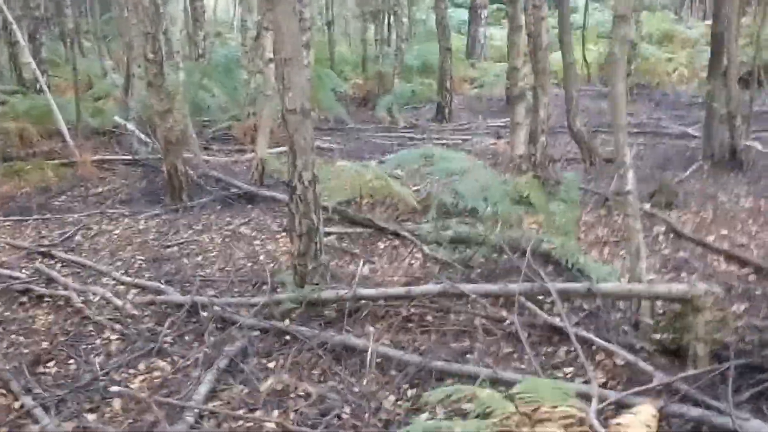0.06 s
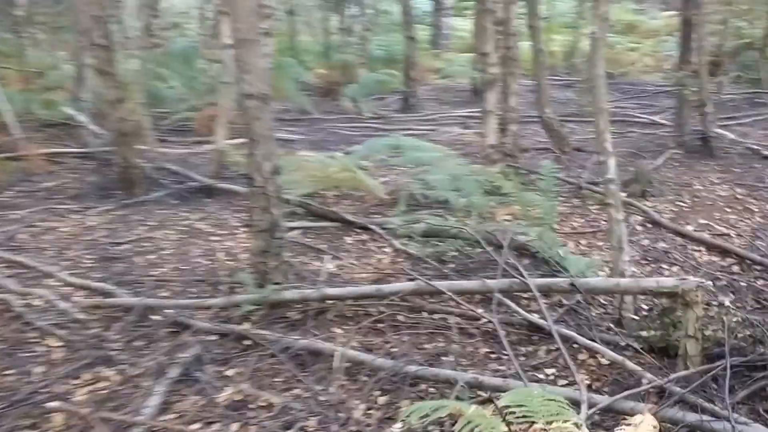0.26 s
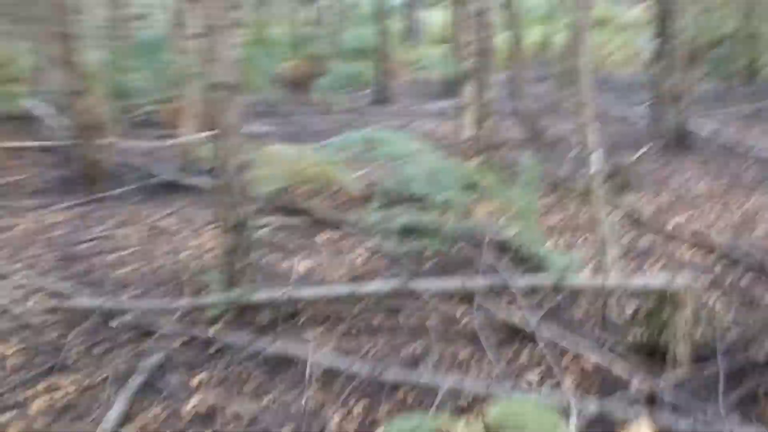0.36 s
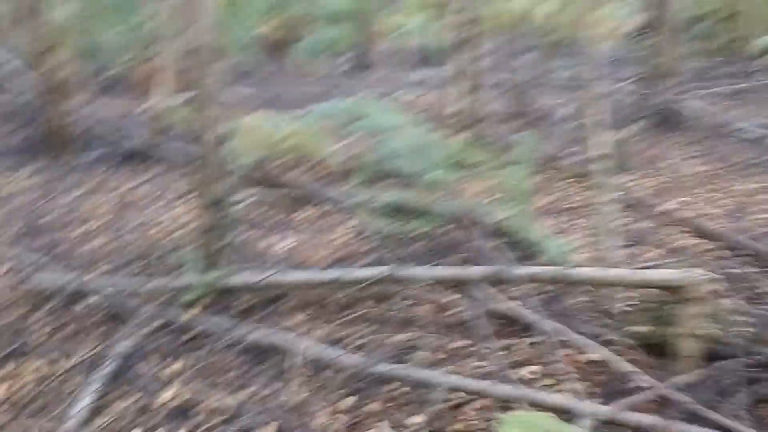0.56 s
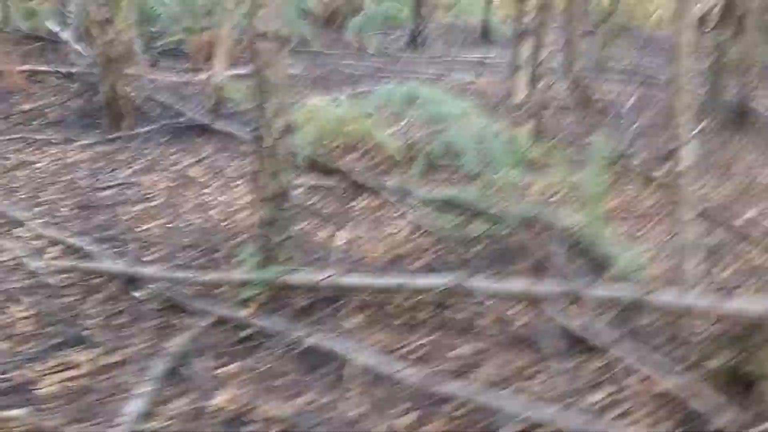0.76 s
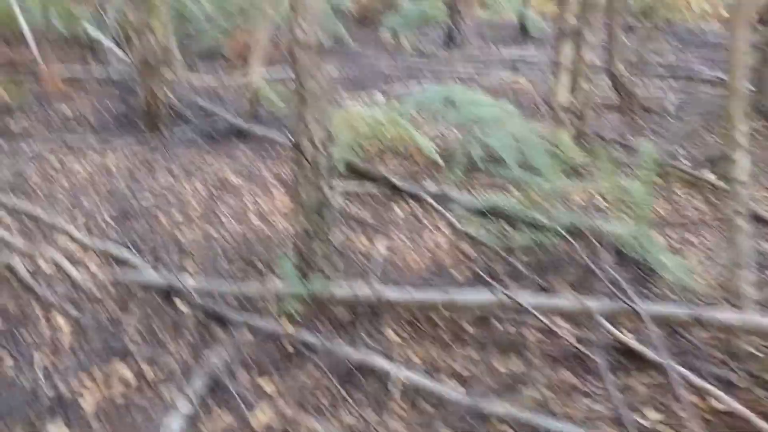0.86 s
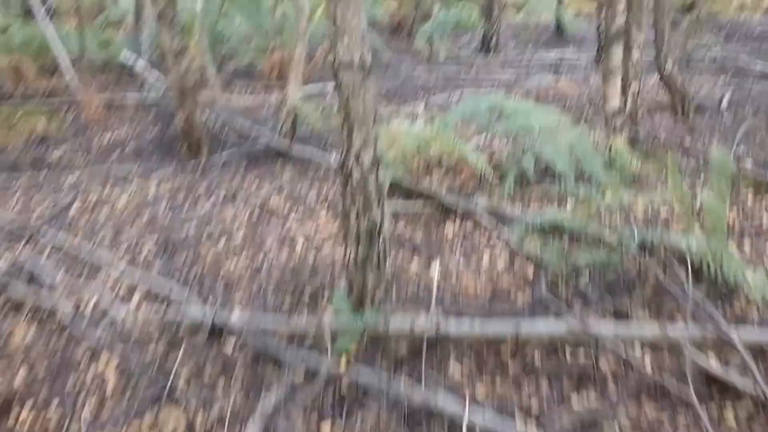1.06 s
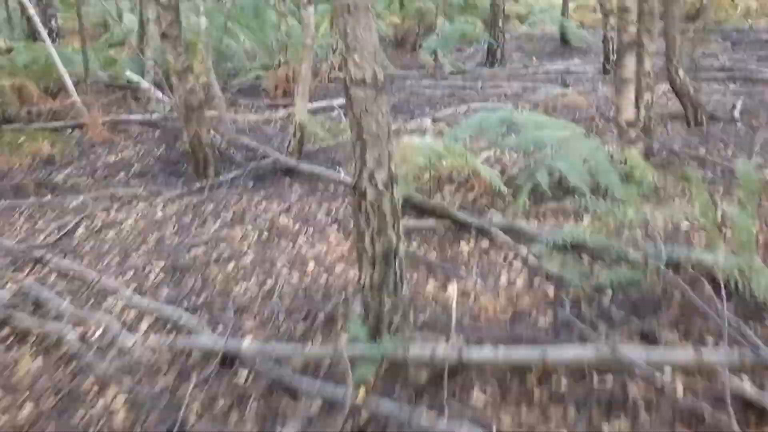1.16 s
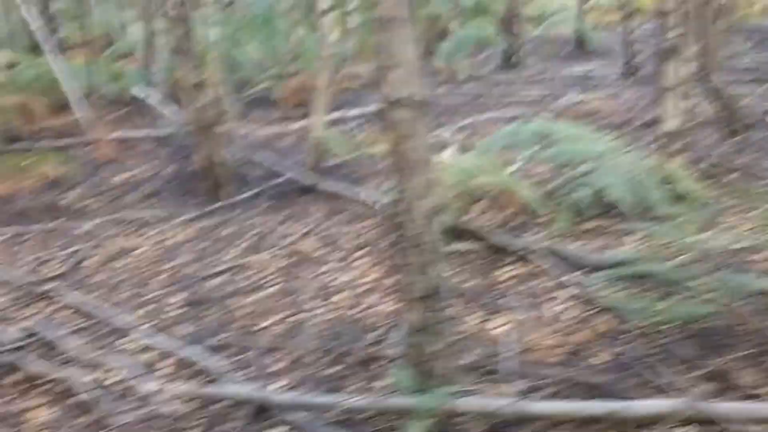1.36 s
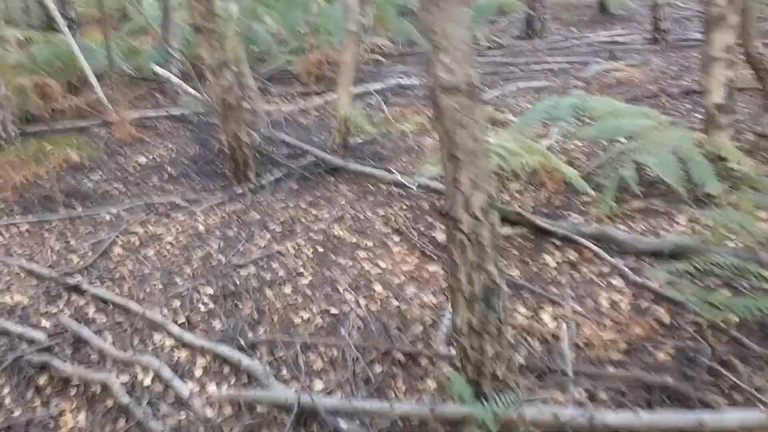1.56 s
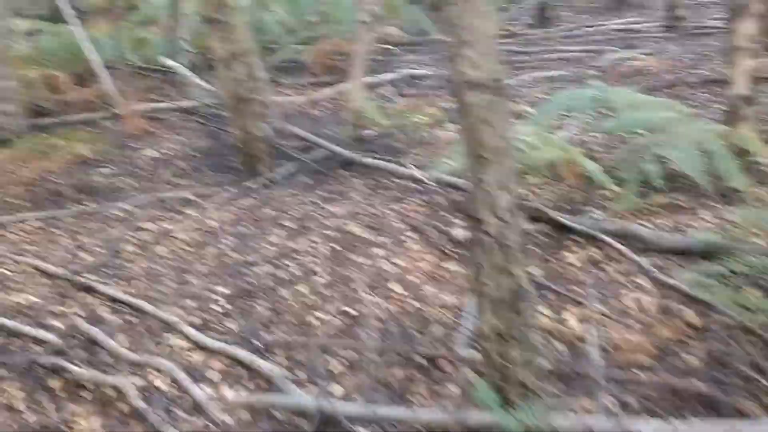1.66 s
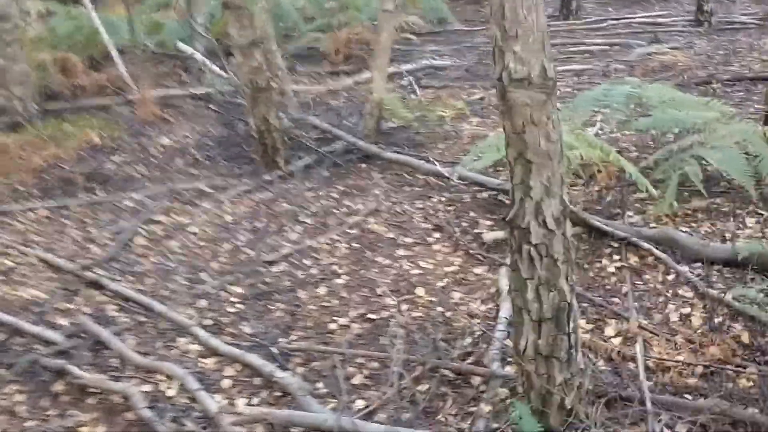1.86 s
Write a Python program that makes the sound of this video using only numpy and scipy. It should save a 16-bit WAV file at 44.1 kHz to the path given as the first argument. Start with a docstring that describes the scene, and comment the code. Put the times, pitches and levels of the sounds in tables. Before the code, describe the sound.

Crisp, crackling rustle of leaf litter and bracken underfoot, with sharp twig snaps and dull thuds

```python
"""A dry rustle is heard first: someone pushes through bracken over leaf litter, the microphone close by.
Crushed leaves are crowds of tiny random impulses, filtered into a crunch, a crackle and a treble fizz.
Dead twigs snap as damped modes with a burst of noise; the ground and undergrowth return the snaps.
Dull thuds are baseline jumps of the recorder that leak away, and stems scrape as narrow-band noise.
Filtered noise gives the rumble of walking and the faint hush of the wood."""
import sys
import numpy as np
from scipy import signal
from scipy.io import wavfile
from scipy.ndimage import uniform_filter1d

SR = 44100
rng = np.random.default_rng(int(sys.argv[2]) if len(sys.argv) > 2 else 0)


def transcribe(signal):
    """Save signal, clipped to [-1, 1], as a 16-bit WAV file at the path in sys.argv[1]."""
    frames = np.atleast_2d(signal).T
    limited = np.clip(frames, -1, 1)
    pcm = np.round(limited * 32767).astype(np.int16)
    wavfile.write(sys.argv[1], SR, pcm)


N = 83790  # length in samples

# Loudness of the rustle in time, before the trims below
# [t/s, crunch level/dB, crackle level/dB, treble level/dB]
RUSTLE_LEVELS = [(0, -51.5, -43.5, -45), (0.045, -51, -47.5, -46), (0.072, -43.5, -43, -39),
                 (0.1, -59, -51, -48.5), (0.13, -64, -56, -55), (0.165, -58.5, -52, -48.5),
                 (0.189, -48, -44.5, -40.5), (0.235, -51, -45.5, -42), (0.272, -58.5, -45, -41.5),
                 (0.288, -46, -38, -31), (0.312, -49.5, -38, -32), (0.335, -61, -48, -40),
                 (0.359, -53, -45.5, -40.5), (0.378, -56, -56, -48), (0.403, -59.5, -44, -41.5),
                 (0.445, -58, -49, -46.5), (0.507, -70, -56, -52.5), (0.517, -52.5, -43, -37.5),
                 (0.571, -60, -47, -42.5), (0.62, -54.5, -49, -38.5), (0.655, -56, -50, -44.5),
                 (0.71, -60, -49, -42.5), (0.765, -52, -47.5, -42.5), (0.791, -43, -37.5, -38),
                 (0.808, -50, -46.5, -38.5), (0.825, -44, -45, -34.5), (0.841, -58, -48, -43),
                 (0.904, -51, -49.5, -42.5), (0.94, -51, -46.5, -38), (0.962, -45, -41.5, -34),
                 (0.982, -68, -47.5, -43.5), (1.018, -46.5, -42.5, -38), (1.035, -75, -72, -60),
                 (1.122, -64, -59, -58), (1.132, -49, -44, -42.5), (1.169, -43.5, -41.5, -39),
                 (1.214, -47.5, -36, -29), (1.257, -54.5, -40.5, -36), (1.295, -53.5, -45.5, -41.5),
                 (1.329, -45.5, -33, -36), (1.351, -55, -43, -38), (1.368, -58, -50.5, -47),
                 (1.41, -74, -54.5, -50.5), (1.456, -64, -54, -47), (1.461, -48.5, -34, -30.5),
                 (1.5, -49.5, -36.5, -30.5), (1.53, -55, -47, -37.5), (1.56, -65, -51, -46),
                 (1.586, -64, -52, -50.5), (1.61, -68, -53, -44), (1.65, -54.5, -46, -47),
                 (1.685, -76, -62, -55.5), (1.734, -74, -62.5, -56), (1.748, -56.5, -50, -43.5),
                 (1.785, -53.5, -48.5, -42.5), (1.806, -47, -40, -39), (1.829, -57, -48.5, -45.5),
                 (1.87, -46.5, -43.5, -39.5), (1.9, -47.5, -44.5, -42)]
# Relative spectra of the three parts of the rustle [f/Hz, level/dB]
CRUNCH_SPECTRUM = [(40, -22.5), (150, -11.5), (300, -7.5), (650, 0), (1100, -3.5), (1700, -8),
                   (4000, -45.5)]
CRACKLE_SPECTRUM = [(500, -39), (1000, -11), (1500, -1.5), (2200, 1), (2550, -3.5), (2900, -6.5),
                    (3300, -1.5), (3750, 0.5), (4600, -10.5), (6000, -13.5), (9000, -45)]
FIZZ_SPECTRUM = [(3000, -24), (5500, -8.5), (6400, -8), (7300, -1), (8300, -1.5), (9200, -5), (10500, 0),
                 (12300, -1), (13300, -2.5), (15600, 1.5), (17000, -5)]
CRUNCH_TRIM_DB, CRACKLE_TRIM_DB, FIZZ_TRIM_DB = -4, -3.5, -2.5
# Relative spectrum of the rumble of walking and handling [f/Hz, level/dB]
RUMBLE_SPECTRUM = [(15, 7), (40, -14.5), (90, -10), (200, -28), (600, -51)]
RUMBLE_TRIM_DB = -3  # relative to the crunch level
# Microphone colour on twig cracks and leaf ticks: bright, with two dips [f/Hz, level/dB]
MIC_COLOUR = [(100, -14.5), (700, -11.5), (2000, -0.5), (2900, -4.5), (3700, -2), (5200, -11.5),
              (7500, -0.5), (9200, -3.5), (11000, 1), (16000, 1.5)]
TICKS_PER_S, TICK_DECAY_S = 45, 0.00023
TICKS_DB = -12.5  # relative to the treble level
# Relative spectrum of the hush of the wood [f/Hz, level/dB]
HUSH_SPECTRUM = [(20, 13), (45, 0), (100, -3), (250, -2.5), (700, -5), (2300, -17.5), (3700, -8),
                 (4800, -23), (6400, -24), (7700, -27), (16000, -12)]
HUSH_DB = -67
# Twig snaps, levels before filtering
# [t/s, pitch f/Hz, knock level/dB, knock decay/s, crack level/dB, crack decay/s]
TWIG_SNAPS = [(.0668, 3900, -39, .0006, -28.5, 0.0014), (.0777, 720, -24.5, 0.0014, -21.5, 0.00087),
              (0.0791, 770, -31.5, 0.0016, -25, 0.0014), (0.145, 1830, -31, 0.0013, -33.5, 0.0013),
              (.2138, 1900, -11.5, 0.00085, -25, 0.00089), (0.2177, 2515, -23.5, 0.0038, -43, 0.0032),
              (.2855, 2040, -30, .001, -28, .0015), (.3068, 1320, -27, 0.0013, -24, .001),
              (0.333, 950, -34, 0.0013, -31, 0.00053), (0.3542, 3200, -43, 0.00072, -26, 0.0011),
              (.3610, 1310, -30, 0.00055, -30, .0005), (.3664, 1780, -15, 0.00025, -19.5, 0.00043),
              (.3668, 840, -17.5, 0.00046, -46, 0.00055), (.4280, 1020, -20.5, 0.00043, -22, 0.00029),
              (0.428, 4170, -15.5, 0.00023, -35, 0.00025), (.6144, 7500, -26, 0.00068, -29, 0.00037),
              (.6820, 806, -33.5, 0.0022, -26, 0.0012), (.7312, 2230, -19, 0.00079, -23, 0.00044),
              (0.7465, 2270, -23.5, 0.00078, -29, 0.00093), (.7740, 870, -28, .001, -26.5, 0.00073),
              (.7855, 910, -18.5, 0.00051, -22, 0.00044), (.7858, 1840, -20, 0.00075, -42, 0.00034),
              (.8190, 1680, -23.5, 0.00078, -24, 0.00056), (0.8227, 940, -32, 0.00062, -25.5, 0.0013),
              (0.8768, 795, -31, 0.0028, -28.5, 0.0014), (0.9202, 590, -24, .0008, -32, .0005),
              (0.9309, 950, -22.5, 0.00089, -34, 0.00061), (.9597, 1900, -23.5, 0.00093, -26, 0.00066),
              (1.0286, 2090, -16.5, 0.00026, -31, 0.00017), (1.1795, 1960, -27, 0.00093, -28, .0006),
              (1.1842, 1000, -22, 0.00084, -16.5, 0.00033), (1.2055, 3570, -26, .0008, -26, .0008),
              (1.2150, 3580, -23, 0.0008, -27, .0008), (1.321, 2970, -14, 0.00068, -23, 0.00063),
              (1.3254, 2180, -32, 0.00081, -29, 0.0017), (1.3500, 2400, -34, .0008, -27, 0.00071),
              (1.3562, 1980, -32, 0.00073, -31, 0.00053), (1.4610, 317, -34.5, 0.0033, -27, 0.00063),
              (1.4865, 1980, -31, 0.0012, -21.5, .0006), (1.5, 2000, -25, .0012, -22, .0006),
              (1.5309, 3830, -26.5, .0008, -28.5, .0012), (1.5493, 3880, -36, 0.0012, -34.5, 0.0019),
              (1.6127, 3800, -47, 0.00039, -36, .0004), (1.6236, 1756, -46, 0.00052, -33.5, .001),
              (1.6327, 3700, -35, 0.00065, -28, .0005), (1.6435, 704, -26, 0.0006, -20, 0.00048),
              (1.0550, 2500, -50, .0008, -42, .0005), (1.8016, 890, -33.5, 0.00091, -37, 0.00095),
              (1.8075, 2250, -30, .001, -36, 0.0012)]
# Modes of a twig [multiple of its pitch, level/dB]
TWIG_MODES = [(1, -4), (.66, -15.5), (1.8, -11.5), (3.2, -11)]
RADIATION_CUTOFF = 0.61  # a twig radiates little below this share of its pitch
SPLINTER_DB, SPLINTER_DECAY_S = -21, 0.0025  # fibres tearing after the break
GROUND_DELAY_S, GROUND_DB = 0.0045, -16
SCATTER_DB, SCATTER_T60_S = -19.5, 0.3  # trunks and undergrowth
# Baseline jumps of the recorder, which leak away and are heard as dull thuds
# [t/s, signed size, rise time constant/s, leak time constant/s]
BASELINE_JUMPS = [(0.3675, .052, 0.00048, 0.08), (0.427, -.026, 0.00053, 0.28),
                  (0.5105, -.054, 0.0019, 0.51), (.667, 0.0087, 0.00033, .12), (.723, 0.012, 0.0014, 0.14),
                  (1.0202, 0.013, .0006, 0.17), (1.0290, 0.015, 0.00024, 0.11),
                  (1.128, -0.01, 0.0024, 0.091), (1.345, 0.013, 0.0015, 0.18),
                  (1.463, -0.0079, 0.0044, .02)]
# Stem scrapes, one list of points for each [t/s, f/Hz, level/dB]
STEM_SCRAPES = [
    [(.515, 2400, -58), (.55, 2390, -51.5), (.62, 2412, -57), (.68, 2334, -52), (.72, 2350, -59)],
    [(1.04, 2560, -84), (1.07, 2567, -63.5), (1.118, 2570, -63.5), (1.131, 2540, -43), (1.16, 2560, -46),
     (1.19, 2590, -44), (1.22, 2570, -59)],
]
SCRAPE_POLE_WIDTH_HZ = 260  # of each of two cascaded poles
BAND_EDGE_HZ = 15850


def amp(db):
    """A level in decibels is twenty times the logarithm of the amplitude ratio."""
    return 10 ** (np.asarray(db) / 20)


def unit(x):
    """The root mean square measures strength; here it is scaled to 1."""
    return x / np.sqrt(np.mean(x ** 2) + 1e-20)


def add(mix, start_s, sound):
    """Superposition: a sound is summed in place from its start time, cut at the end of the mix."""
    part = mix[round(start_s * SR):][:len(sound)]
    part += sound[:len(part)]


def colour(x, points):
    """Minimum-phase filtering: the Hilbert transform of the log gain gives a causal response."""
    size = 4096
    hz, db = np.transpose(points)
    bin_hz = abs(np.fft.fftfreq(size, 1 / SR))
    gain_db = np.interp(np.log(bin_hz + 1), np.log(hz), db)
    log_gain = np.log(amp(gain_db))
    taps = np.fft.ifft(np.exp(np.conj(signal.hilbert(log_gain)))).real
    return signal.fftconvolve(x, taps[:size // 2])[:N]


def wander(step_s):
    """Random modulation: straight lines join normal random values, one for each step."""
    steps = np.arange(N) / SR / step_s
    return np.interp(steps, np.arange(N), rng.standard_normal(N))


def leaves(spectrum, clumps_db, per_s, spread_db, own_db, rub_db):
    """Impulsive excitation: tiny cracks of uneven size come in clumps over the rubbing of leaf on leaf."""
    size = amp(spread_db * np.minimum(rng.exponential(1, N), 4))
    sign = rng.choice([-1, 1], N)
    happens = rng.random(N) < per_s / SR
    cracks = unit(size * sign * happens)
    rubbing = amp(rub_db) * rng.standard_normal(N)
    drive = (cracks + rubbing) * amp(clumps_db + own_db * wander(0.003))
    # even out the slow level, over about 30 ms, but keep the short clumps
    drive /= np.sqrt(uniform_filter1d(drive ** 2, size=1300) + 1e-9)
    return unit(colour(drive, spectrum))


def rustle():
    """Many small fractures sum to crunch, crackle and fizz; the rumble of walking follows the crunch."""
    s, *levels = np.transpose(RUSTLE_LEVELS)
    t = np.arange(N) / SR
    low, mid, high = (amp(np.interp(t, s, db)) for db in levels)
    clumps_db = 1.96 * wander(0.0016)  # shared by all three parts
    crunch = leaves(CRUNCH_SPECTRUM, clumps_db, per_s=700, spread_db=3.5, own_db=-1.5, rub_db=2)
    crackle = leaves(CRACKLE_SPECTRUM, clumps_db, per_s=1500, spread_db=2.0, own_db=1.0, rub_db=2)
    fizz = leaves(FIZZ_SPECTRUM, clumps_db, per_s=3000, spread_db=2.0, own_db=2.0, rub_db=0.0)
    rumble = unit(colour(rng.standard_normal(N), RUMBLE_SPECTRUM))
    litter = amp(CRUNCH_TRIM_DB) * low * crunch + amp(CRACKLE_TRIM_DB) * mid * crackle
    return litter + amp(FIZZ_TRIM_DB) * high * fizz + amp(RUMBLE_TRIM_DB) * low * rumble


def ticks():
    """Single fractures: each dry leaf breaks with a bright, fast-decaying burst of noise."""
    s, _, _, treble_db = np.transpose(RUSTLE_LEVELS)
    train = (rng.random(N) < TICKS_PER_S / SR) * rng.uniform(0.55, 1, N)
    decay = np.exp(-1 / (TICK_DECAY_S * SR))
    bursts = signal.lfilter([1], [1, -decay], train) * rng.standard_normal(N)
    level_db = TICKS_DB + np.interp(np.arange(N) / SR, s, treble_db)
    return amp(level_db) * unit(colour(bursts, MIC_COLOUR))


def hush():
    """Stationary filtered noise stands for the faint background of the wood."""
    return amp(HUSH_DB) * unit(colour(rng.standard_normal(N), HUSH_SPECTRUM))


def twigs():
    """Fracture and modal ringing: a sharp crack, damped modes whose higher ones die sooner, splintering."""
    knocks, cracks = np.zeros(N), np.zeros(N)
    t = np.arange(SR // 30) / SR
    for s, hz, knock_db, knock_s, crack_db, crack_s in TWIG_SNAPS:
        ring = np.zeros(len(t))
        for k, db in TWIG_MODES:
            decay = np.exp(-t * np.sqrt(k) / knock_s)
            ring += amp(db) * decay * np.sin(2 * np.pi * hz * k * t)
        radiate = signal.butter(2, RADIATION_CUTOFF * hz, "high", fs=SR)
        add(knocks, s, amp(knock_db) * signal.lfilter(*radiate, ring))
        tear = np.exp(-t / crack_s) + amp(SPLINTER_DB) * np.exp(-t / SPLINTER_DECAY_S)
        add(cracks, s, amp(crack_db) * tear * rng.choice([-1, 1], len(t)))
    return knocks + colour(cracks, MIC_COLOUR)


def surroundings(x):
    """Reflection and scattering: convolution adds a ground bounce and sparse, decaying random echoes."""
    t = np.arange(SR // 3) / SR
    sparse = rng.random(len(t)) < 0.1
    echo = rng.standard_normal(len(t)) * sparse * amp(-60 * t / SCATTER_T60_S)
    echo *= amp(SCATTER_DB) / np.linalg.norm(echo)
    add(echo, GROUND_DELAY_S, amp([GROUND_DB]))
    return x + signal.fftconvolve(x, echo)[:N]


def baseline_jumps():
    """Step response: the recorder's baseline jumps and leaks away exponentially, heard as dull thuds."""
    baseline, t = np.zeros(N), np.arange(N) / SR
    for s, size, rise_s, leak_s in BASELINE_JUMPS:
        add(baseline, s, size * (1 - np.exp(-t / rise_s)) * np.exp(-t / leak_s))
    return baseline


def scrape(points):
    """Resonance under friction: narrow-band noise on a gliding pitch gives a stem's thin, fuzzy ring."""
    t = np.arange(N) / SR
    s, hz, db = np.transpose(points)
    pole = np.exp(-np.pi * SCRAPE_POLE_WIDTH_HZ / SR)
    drift = rng.standard_normal(N) + 1j * rng.standard_normal(N)
    for _ in range(2):
        drift = signal.lfilter([1 - pole], [1, -pole], drift)
    turns = np.cumsum(np.interp(t, s, hz)) / SR
    ring = unit((drift * np.exp(2j * np.pi * turns)).real)
    sounding = (t > s[0]) & (t < s[-1])
    return amp(np.interp(t, s, db)) * sounding * ring


def scene():
    """Linear superposition of leaves, hush, twigs, baseline jumps and stems; only the twigs are echoed."""
    stems = sum(scrape(points) for points in STEM_SCRAPES)
    return (rustle() + ticks() + hush() + surroundings(twigs()) + baseline_jumps() + stems)[None]


def record(dry):
    """Band limitation: a linear-phase low-pass sets the recorder's upper edge."""
    lowpass = signal.firwin(401, BAND_EDGE_HZ, window=("kaiser", 8), fs=SR)
    return signal.oaconvolve(dry, lowpass[None], "same")


dry = scene()
out = record(dry)
transcribe(out)
```